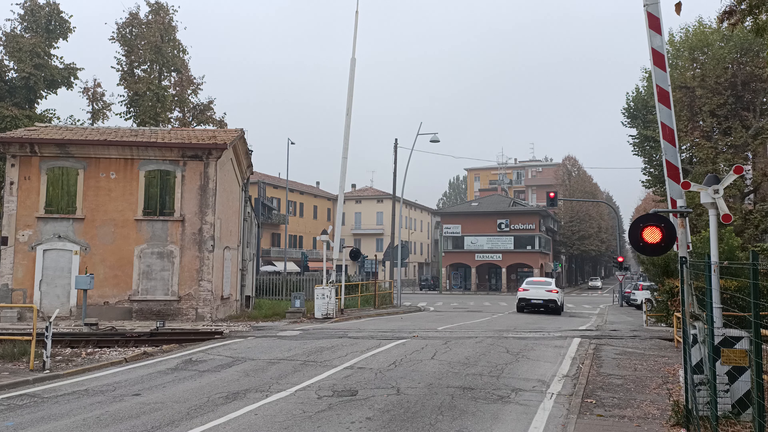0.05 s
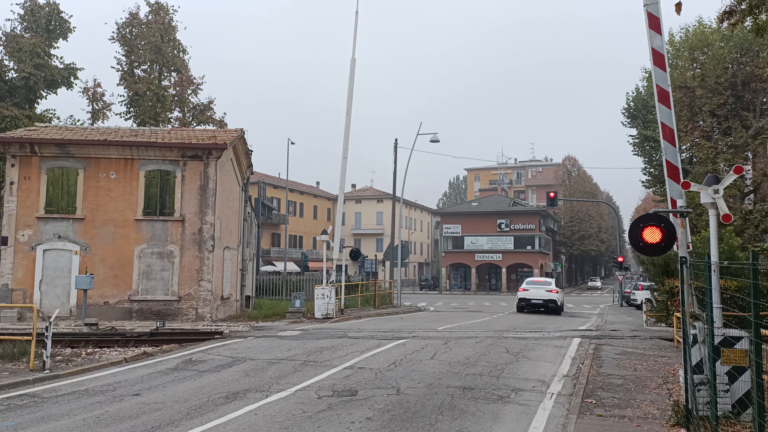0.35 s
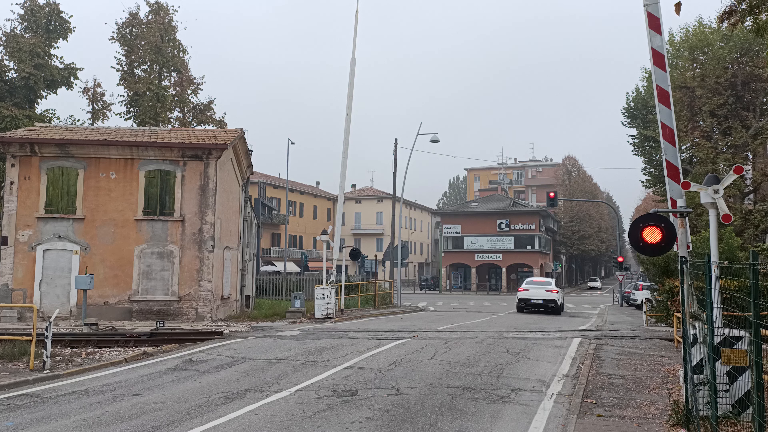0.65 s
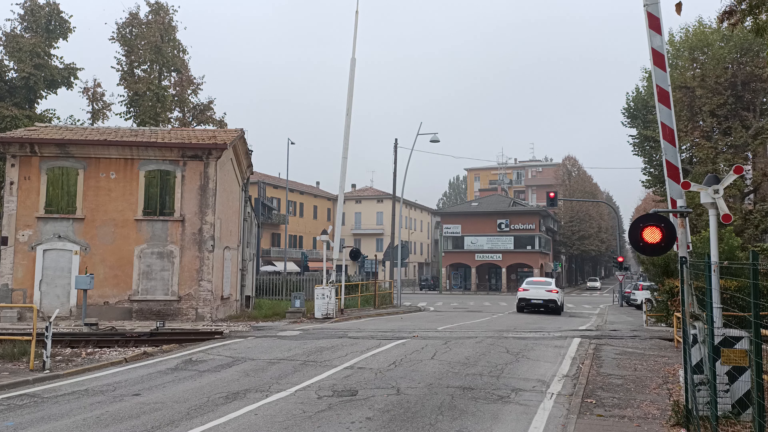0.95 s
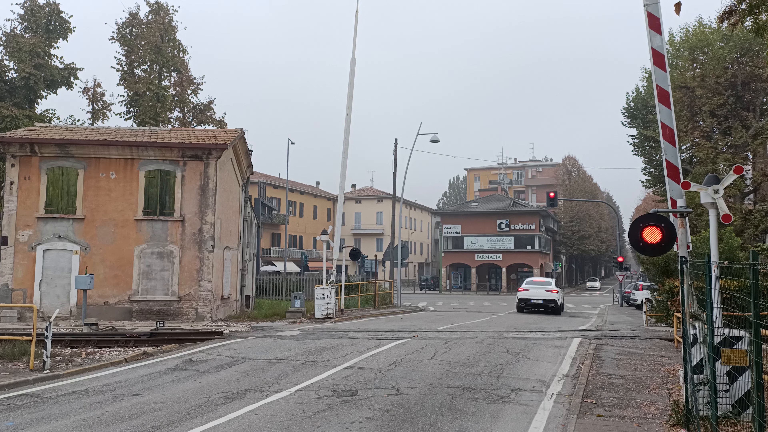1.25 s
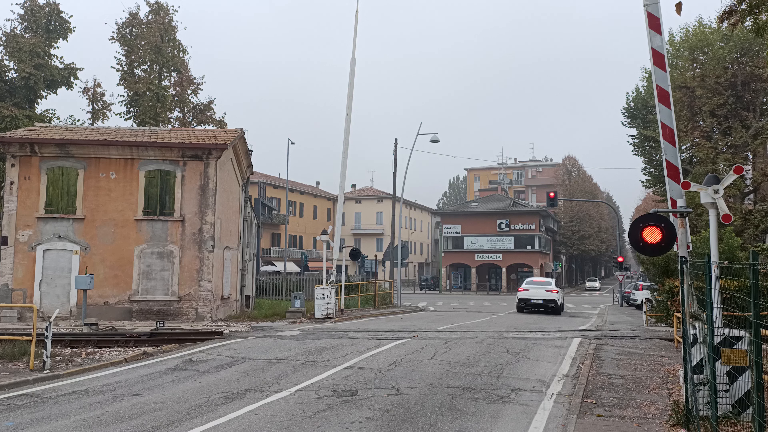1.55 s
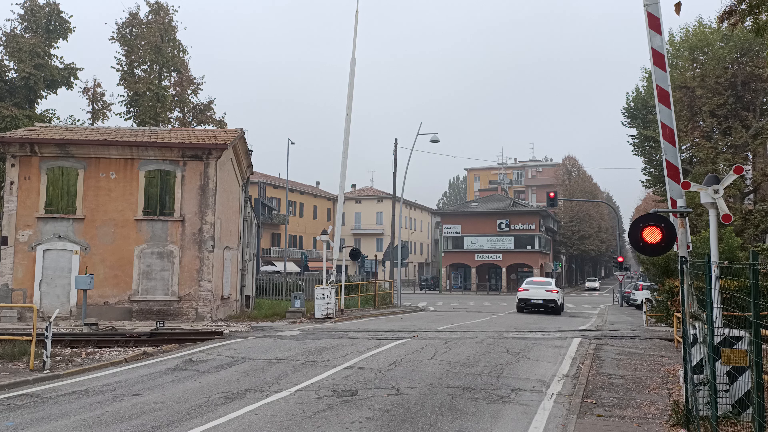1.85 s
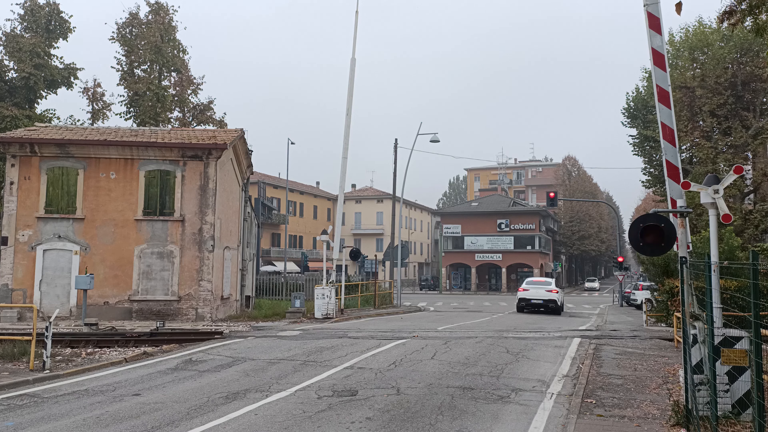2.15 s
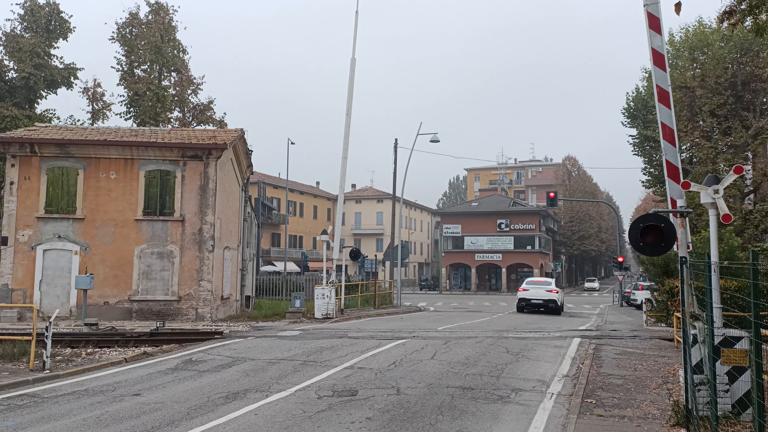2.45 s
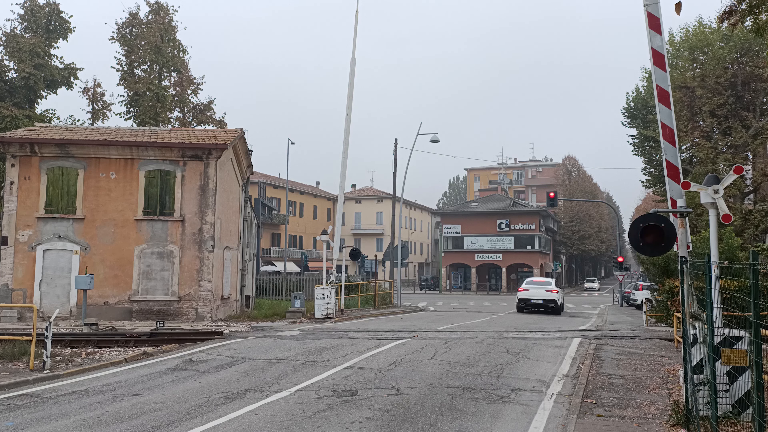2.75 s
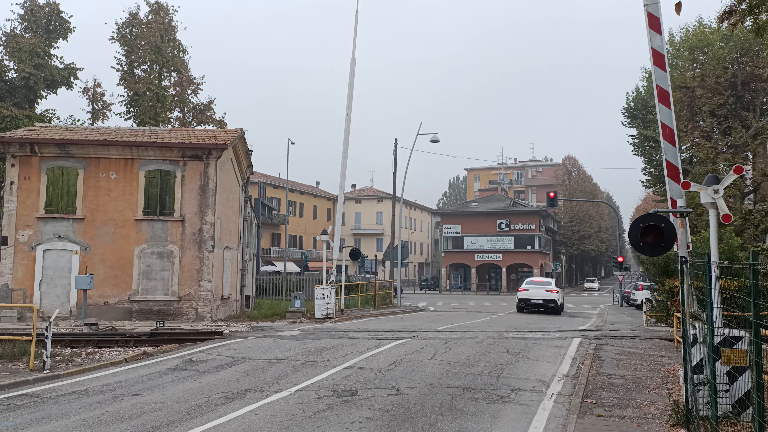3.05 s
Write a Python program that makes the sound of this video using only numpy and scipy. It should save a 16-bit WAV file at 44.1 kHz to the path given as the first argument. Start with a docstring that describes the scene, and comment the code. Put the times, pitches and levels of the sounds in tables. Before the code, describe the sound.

A level crossing barrier finishes rising, its geared motor humming and grinding under sharp metal clicks and clacks. It stops halfway with a latch snap and a low shudder, leaving an idling car and distant traffic outdoors.

```python
"""Beside a quiet town road, a level-crossing barrier finishes rising. Its geared motor hums and grinds
in a steel cabinet while a pawl lifts with a click and drops with a clack. The linkage knocks and
chatters into its stop, the motor cuts out and a latch snaps shut. The cabinet shudders and a low
drone swells and dies as the arm settles. A car idles over distant traffic, with faint high squeaks
and, near the end, the hiss of approaching tyres."""
import sys
import numpy as np
from scipy import signal
from scipy.fft import rfft, irfft
from scipy.io import wavfile
from scipy.ndimage import uniform_filter1d

SR = 44100
rng = np.random.default_rng(int(sys.argv[2]) if len(sys.argv) > 2 else 0)


def waveform_to_disk(signal):
    """Save audio, clipped to [-1, 1], as 16-bit WAV at the path in sys.argv[1]."""
    frames = np.transpose(np.atleast_2d(signal))
    scaled = np.clip(frames, -1, 1) * 32767
    samples = np.round(scaled).astype(np.int16)
    wavfile.write(sys.argv[1], SR, samples)


N = 176400

# Boom of the idling car's second harmonic. Each row: time in seconds, level in dB.
IDLE_BOOM = [(0, -51.5), (.55, -47), (1.0, -52.5), (1.45, -43.5), (2.0, -48.5), (2.55, -50), (3.1, -48.5),
             (3.45, -57.5), (3.62, -48), (4, -48.5)]
# Fader rides for the traffic and the gear hum. Each row: time in seconds, level in dB.
TRAFFIC_RIDE = [(0, -45), (2.5, -44.5), (3.1, -46), (3.45, -45.5), (3.7, -45.5), (4, -43.5)]
HUM_RIDE = [(0, -36.5), (.2, -41.5), (.32, -35), (.6, -39.5), (.9, -37.5), (1.2, -37.5), (1.45, -34),
            (1.53, -38), (1.7, -33), (1.92, -30.5), (2.0, -37), (2.08, -35.5), (2.17, -72)]
# Rate at which the gear teeth meet. Each row: time in seconds, rate in Hz.
MESH_RATE = [(0, 242.5), (.5, 242.8), (1.42, 242.6), (1.8, 242.7), (2.08, 241.5), (2.2, 238)]
# Partials of the hum. Each row: multiple of the mesh rate, level in dB, left over right in dB.
HUM_PARTIALS = [(1, -23, -1), (2, -1, -4), (2.94, -13.5, -1), (3, -17, 10.5), (4, -20, -5), (5.15, -20, -1),
                (6.18, -22.5, 6)]
# Housing resonances that the gears keep ringing. Each row: pitch in Hz, level in dB.
HOUSING_MODES = [(212, -17.5), (245, -20), (362, -22), (1350, -15.5), (1428, -14), (2042, -17.5),
                 (2155, -22.5), (2543, -26.5), (4101, -23), (4559, -28)]
# Light clicks of pawl and linkage. Each row: start in seconds, then level, ring, sizzle and
# left over right, all in dB.
CLICKS = [(0.1132, -40, 1.5, 7, -3), (.7712, -34.5, -0.5, -0.5, -1.5), (1.4338, -37.5, 5, 2, -3),
          (1.9419, -33.5, -9.5, 5, 2), (1.951, -41, -4, 11, -4), (2.075, -37.5, -9, 4, -9),
          (2.1574, -30.5, -17, 0, -1)]
# Pawl drops and a bounce, cut-out switch and latch. Each row: start in seconds, then level, knock, bite
# and sizzle in dB, attack in seconds, the crack's t60 in seconds and its left over right in dB.
CLACKS = [(0.2522, -20, -1, 1, 4, 0.0008, 0.059, -5.5), (.2597, -26, -8, -13, 6, .0004, .07, 4),
          (0.9097, -21, -6, 0, 0, .0007, 0.1, -3), (1.5738, -19.5, -4.5, 0, 1, .0005, 0.09, -2),
          (2.0827, -22.5, -1, 9.5, 14, 0.00075, 0.11, -3), (2.2958, -19.5, -6, 3.5, -1, 0.0003, 0.08, -4.5)]
# Ring of the pawl and of the cabinet. Each row: pitch in Hz, level in dB, t60 in seconds.
PAWL_MODES = [(4240, -0.5, 0.076), (4610, 1.5, 0.12), (5100, -3, 0.072), (5930, -6, 0.072),
              (8700, -11, 0.2), (10000, -19.5, 0.29)]
CABINET_MODES = [(358, -26, 0.4), (469, -13.5, 0.22), (909, -10.5, 0.091), (1253, -21, 0.38),
                 (1512, -16, 0.14), (2430, -17.5, 0.15), (2874, -21, 0.24), (4280, -23, 0.17),
                 (6600, -18, 0.1)]
# Faint squeaks. Each row: peak time in seconds, pitch in Hz, length in seconds, level in dB.
SQUEAKS = [(.603, 10800, 0.012, -55), (3.462, 9450, 0.022, -73), (3.677, 10300, 0.06, -75.5),
           (3.843, 10900, 0.03, -71)]
# Dull linkage knocks and taps of a loose link. Each row: start in seconds, level in dB.
THUDS = [(1.432, -33), (1.585, -34), (2.305, -40)]
TAPS = [(1.477, -38), (1.987, -29.5), (2.198, -32)]
# Drone of the settling arm. Each row: time in seconds, pitch in Hz, level in dB.
DRONE = [(1.8, 67.75, -57), (1.89, 75, -46), (1.96, 75.5, -39), (2.09, 74.4, -48.5), (2.19, 79.1, -42),
         (2.3, 79, -46), (2.45, 75.7, -40.5), (2.67, 75, -46), (2.75, 72, -34), (2.81, 72, -40),
         (2.88, 65.6, -58)]
# Tone colours of the noise layers. Each row: frequency in Hz, relative spectral density in dB.
TRAFFIC_COLOUR = [(25, -43), (50, -6.5), (70, -10.5), (100, -6), (160, -11.5), (200, -13), (280, -8.5),
                  (420, -16.5), (650, -17.5), (900, -17), (1200, -21), (2050, -25.5), (2900, -32.5),
                  (7300, -46), (8600, -53.5), (16000, -55)]
GRIND_COLOUR = [(150, -24), (200, -13), (300, -18), (480, -11.5), (720, -13), (1100, -20.5), (1450, -9.5),
                (1800, -16), (2100, -15.5), (2500, -32.5), (3300, -23.5), (4320, -23.5), (5460, -36.5),
                (7040, -33.5), (9440, -53), (10600, -49), (16000, -60)]
CLICK_COLOUR = [(800, -34), (2400, -5), (3400, -2.5), (4700, -2), (6500, -1.5), (8300, -13.5), (10300, -18),
                (14500, -25), (16000, -33)]
CLACK_COLOUR = [(120, -31), (400, 5.5), (700, 4.5), (1050, -1), (1450, 5), (1900, -2), (2700, 0.5),
                (4600, 2), (6000, -2), (7700, -7.5), (8900, -25.5), (10300, -17), (13000, -19),
                (15000, -22), (16000, -35)]
CHATTER_COLOUR = [(3000, -8), (6500, 0), (9500, -1), (11000, -5), (15500, -10)]
SHUDDER_COLOUR = [(80, -4), (105, 12), (170, -4.5), (320, 0), (500, 1.5), (1200, -36)]
TYRE_COLOUR = [(1500, 13.5), (4000, -2), (6500, -2), (7400, 1.5), (8400, -12), (15000, -15)]

NEAR_ALIKE_HZ, FAR_ALIKE_HZ = 800, 550  # both ears hear nearly the same below these
DIRECT_SHARE = 0.2  # part of the barrier's treble that is alike at both ears
ATTACK_S, SIZZLE_PAN_DB = 0.0023, -3.5
TIME = np.arange(N) / SR
FREQS = np.maximum(np.arange(N // 2 + 1) * SR / N, 1)
SIZZLE = 1 / (1 + (9050 / FREQS) ** 10)  # picks out the top treble of a strike


def undb(db):
    """Decibels to gain."""
    return 10 ** (np.asarray(db) / 20)


def unit(x):
    """Scale to rms 1."""
    return x / np.sqrt(np.mean(x ** 2))


def curve(rows, column=1):
    """One column of a table, joined by straight lines in time."""
    rows = np.array(rows)
    return np.interp(TIME, rows[:, 0], rows[:, column])


def pan(db):
    """Left and right gains; positive leans left."""
    return undb(np.array([[db], [-db]]) / 2)


def wander(rate_hz):
    """Smooth random drift with rms 1."""
    hold = int(SR / rate_hz)
    steps = np.repeat(rng.standard_normal(N // hold + 1), hold)[:N]
    return unit(uniform_filter1d(steps, hold))


def turn(hz):
    """Phase of something that cycles at a changing rate."""
    return 2 * np.pi * np.cumsum(hz) / SR


def stereo_noise(gain, alike_hz=NEAR_ALIKE_HZ, direct=DIRECT_SHARE):
    """Shaped noise, nearly mono in the bass; in the treble only its direct share is alike at both ears."""
    direct = min(direct, 0.95)
    alike = direct + (0.95 - direct) / (1 + (FREQS / alike_hz) ** 4)
    mid, side = rfft(rng.standard_normal((2, N))) * gain * np.sqrt([1 + alike, 1 - alike])
    return unit(irfft(np.array([mid + side, mid - side]), N))


def noise(colour, alike_hz=NEAR_ALIKE_HZ, direct=DIRECT_SHARE):
    """Stereo noise in a tone colour, rolled off below its lowest point."""
    hz, db = np.array(colour).T
    gain = undb(np.interp(np.log(FREQS), np.log(hz), db))
    return stereo_noise(gain / (1 + (hz[0] / FREQS / 2) ** 4), alike_hz, direct)


def band(hz, width_hz):
    """Stereo noise in one resonance."""
    return stereo_noise(1 / (1 + ((FREQS - hz) / width_hz * 2) ** 2))


def eq(x, gain):
    """Filter a sound with one gain per frequency."""
    return irfft(rfft(x) * gain, N)


def fade(t60):
    """Exponential decay, 60 dB down after t60 seconds."""
    return np.exp(-np.log(1000) * np.minimum(TIME / t60, 10))


def blow(t60, attack_s=ATTACK_S):
    """Envelope of a hit: quick rise, decay and a weak tail from nearby walls."""
    return (1 - np.exp(-TIME / attack_s)) * np.hypot(fade(t60), undb(-15) * fade(t60=0.23))


def swell(peak_s, width_s):
    """A bell-shaped rise and fall."""
    return np.exp(-np.minimum(((TIME - peak_s) / width_s) ** 2, 20))


def at(x, start_s):
    """Delay a sound to its start time."""
    return np.pad(x, ((0, 0), (int(start_s * SR), 0)))[:, :N]


def aside(x, lag_s):
    """The far ear hears a source later; a positive lag puts it on the right."""
    return np.vstack([at(x[:1], max(lag_s, 0)), at(x[1:], max(-lag_s, 0))])


def panels(spacing_hz, depth_db):
    """EQ of a steel box: many narrow peaks and dips, different at each ear."""
    grid = np.arange(0, SR / 2, spacing_hz)
    peaks = rng.standard_normal((N // 100, 2)).T
    ripple = np.array([np.interp(FREQS, grid, ear[:len(grid)]) for ear in peaks])
    return unit(undb(depth_db * ripple * np.minimum(FREQS / NEAR_ALIKE_HZ / 2, 1)))


def idling_car(firing_hz=64.8):
    """An engine fires a little unevenly and booms at its second harmonic."""
    firing = turn(firing_hz * (1 + 0.01615 * wander(15)))
    fundamental = np.sin(firing) * undb(-56.5 + 4.5 * wander(9.4))
    boom = np.sin(2 * firing) * undb(curve(IDLE_BOOM) + 2 * wander(15))
    return np.sqrt(2) * (fundamental + boom)


def traffic():
    """A wide bed of distant traffic, part of it arriving from the left."""
    diffuse = noise(TRAFFIC_COLOUR, FAR_ALIKE_HZ, direct=0)
    from_left = aside(noise(TRAFFIC_COLOUR, FAR_ALIKE_HZ, direct=1), lag_s=-0.000507)
    return unit(diffuse + undb(-6.5) * from_left) * undb(curve(TRAFFIC_RIDE) - 0.4 * wander(5))


def motor(box, cut_out_s=2.166, run_down_db_per_s=88):
    """Gears hum at partials of the mesh rate and scrape once per tooth, dying away after the cut-out."""
    mesh_hz, hum = curve(MESH_RATE), 0
    for multiple, db, pan_db in HUM_PARTIALS:
        jitter = 1 + 0.00523 * wander(39.88)
        tone = np.sqrt(2) * np.sin(turn(multiple * mesh_hz * jitter))
        hum += tone * undb(db + 1.1 * wander(30.24)) * pan(pan_db)
    teeth = unit(1 + 0.14 * np.cos(turn(mesh_hz)))
    scrape = eq(noise(GRIND_COLOUR), box) * teeth
    housing = sum(undb(db) * band(hz, width_hz=16) for hz, db in HOUSING_MODES)
    grind = (scrape + housing) * undb(-36.5 + wander(34.64)) * pan(-1.5)
    run_down = undb(-run_down_db_per_s * np.maximum(TIME - cut_out_s, 0))
    return (hum * undb(curve(HUM_RIDE)) + grind) * run_down


def pawl_clicks(box, attack_s=0.00063, rebound_s=0.047):
    """The pawl lifts with a tick, rattles in its resonances and rebounds."""
    out, strike = 0, blow(t60=0.14, attack_s=attack_s)[None]
    strikes = strike + undb(-13.5) * at(strike, rebound_s)
    for start_s, db, ring_db, sizzle_db, pan_db in CLICKS:
        tick = eq(noise(CLICK_COLOUR), box * undb(sizzle_db * SIZZLE)) * strikes
        rattle = sum(undb(mode_db) * band(hz, width_hz=320) * blow(t60, attack_s)
                     for hz, mode_db, t60 in PAWL_MODES)
        out += undb(db) * pan(pan_db) * at(tick + undb(ring_db) * rattle, start_s)
    return out


def clacks(box, knock_hz=1570, bite_hz=2520, bite_width_hz=1350):
    """Steel drops on steel: a bright crack, a longer low knock and the ring of the cabinet."""
    out = 0
    lows = 1 / (1 + (FREQS / knock_hz) ** 4)
    bite = np.exp(-((FREQS - bite_hz) / bite_width_hz * 2) ** 2)
    for start_s, db, knock_db, bite_db, sizzle_db, attack_s, t60, pan_db in CLACKS:
        metal = eq(noise(CLACK_COLOUR), box * pan(SIZZLE_PAN_DB) ** SIZZLE)
        metal = eq(metal, panels(spacing_hz=172.6, depth_db=2.5))  # each spot has its own resonances
        highs = (1 - lows) * undb(sizzle_db * SIZZLE + bite_db * bite)
        crack = eq(metal, highs) * blow(t60, attack_s) * pan(pan_db)
        knock = eq(metal, lows) * blow(t60=0.14, attack_s=attack_s) * undb(knock_db)
        out += undb(db) * at(crack + knock + cabinet_ring(), start_s)
    return out


def cabinet_ring():
    """The struck cabinet rings in decaying modes, a little different at each hit and each ear."""
    t, out = TIME[:SR // 2], np.zeros((2, N))
    for hz, db, t60 in CABINET_MODES:
        strength, detune, skew = rng.standard_normal(3)
        phase = rng.uniform(0, 2 * np.pi) + np.array([[0], [skew * hz / NEAR_ALIKE_HZ / 2]])
        tone = np.sin(2 * np.pi * hz * (1 + 0.0045 * detune) * t + phase)
        out[:, :len(t)] += undb(db + 2 * strength) * fade(t60)[:len(t)] * tone
    return out * (1 - np.exp(-TIME / ATTACK_S))


def squeaks():
    """Faint, very high squeaks: brief swells of narrow noise."""
    return sum(band(hz, width_hz=260) * undb(db) * swell(peak_s, length_s / 2)
               for peak_s, hz, length_s, db in SQUEAKS)


def linkage_thuds():
    """The linkage knocks dully on the cabinet as the load shifts."""
    return sum(undb(db) * at(band(hz=365, width_hz=49)[:1] * blow(t60=0.17), start_s)
               for start_s, db in THUDS)


def link_taps():
    """A loose link taps, short and bright, after some of the clicks."""
    return sum(undb(db) * at(band(hz=2950, width_hz=360) * blow(t60=0.043), start_s)
               for start_s, db in TAPS)


def arm_drone():
    """A low drone swells, then sags in pitch and dies as the arm settles."""
    tone = np.sqrt(2) * np.sin(turn(curve(DRONE)))
    return tone * undb(curve(DRONE, column=2) + 0.6 * wander(11))


def linkage_chatter(box, ticks_per_s=220):
    """The linkage chatters in fine ticks as it runs into its stop."""
    ticks = (rng.random(N) < ticks_per_s / SR) * rng.exponential(size=N)
    envelope = unit(signal.fftconvolve(ticks, fade(t60=0.02))[:N])
    steel = eq(noise(CHATTER_COLOUR), box) * pan(SIZZLE_PAN_DB)
    return steel * envelope * undb(-53) * swell(peak_s=2.01, width_s=0.1)


def cabinet_shudder():
    """The cabinet shudders at the stop with a short, low rumble."""
    return noise(SHUDDER_COLOUR) * undb(-38.5) * swell(peak_s=2.182, width_s=0.19)


def tyres():
    """The tyres of an approaching car swell into a wide hiss."""
    return noise(TYRE_COLOUR, FAR_ALIKE_HZ, direct=0) * undb(-59) * swell(peak_s=3.81, width_s=0.71)


def twitter():
    """A fine high twitter flickers among the last squeaks."""
    return band(hz=9680, width_hz=600) * undb(-81 + 4.5 * wander(60)) * swell(peak_s=3.7, width_s=0.31)


def scene():
    """The barrier drive, a little to the right, over its street."""
    box = panels(spacing_hz=34.86, depth_db=4)
    drive = motor(box) + clacks(box) + pawl_clicks(box)
    linkage = link_taps() + linkage_chatter(box) + linkage_thuds()
    settling = arm_drone() + cabinet_shudder()
    street = idling_car() + traffic() + tyres() + squeaks() + twitter()
    return aside(drive + linkage, lag_s=0.0002) + settling + street


def record(dry):
    """A steep low-pass trims the air above 16 kHz."""
    return signal.sosfilt(signal.ellip(8, 0.2, 70, 16000, fs=SR, output="sos"), dry)


dry = scene()
out = record(dry)
waveform_to_disk(out)
```